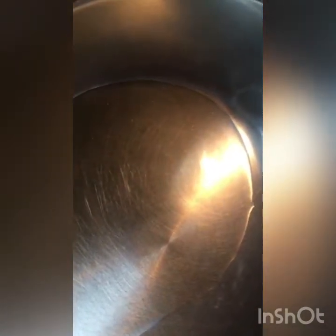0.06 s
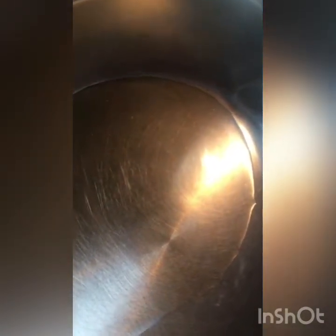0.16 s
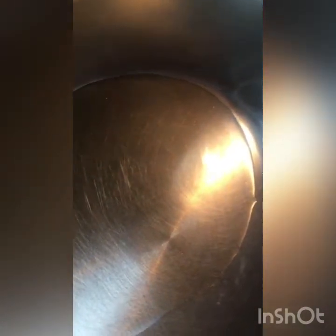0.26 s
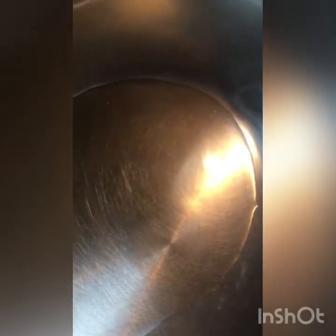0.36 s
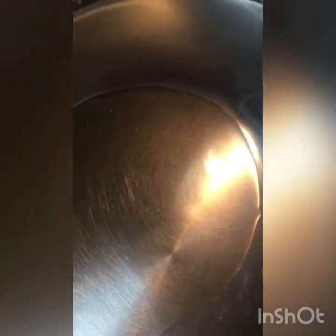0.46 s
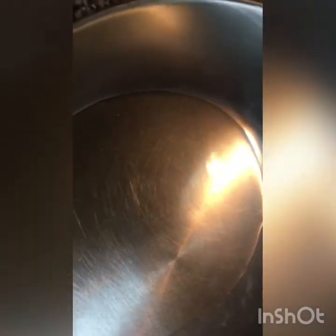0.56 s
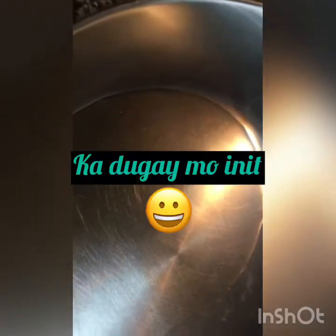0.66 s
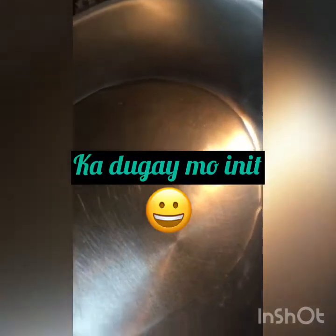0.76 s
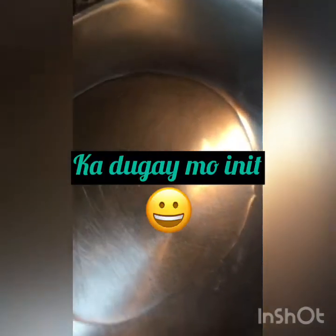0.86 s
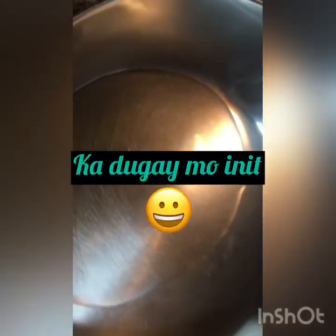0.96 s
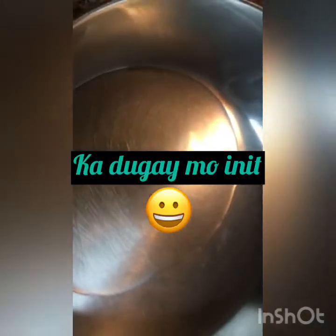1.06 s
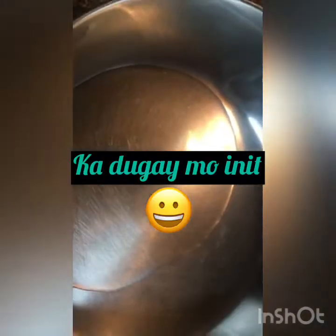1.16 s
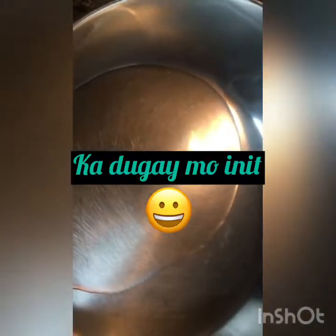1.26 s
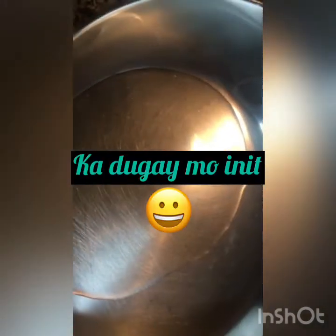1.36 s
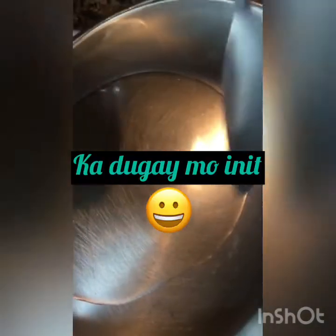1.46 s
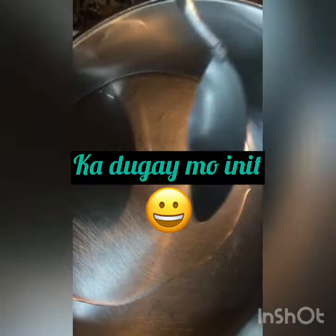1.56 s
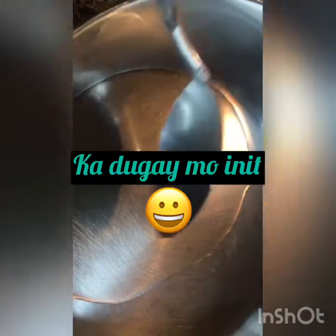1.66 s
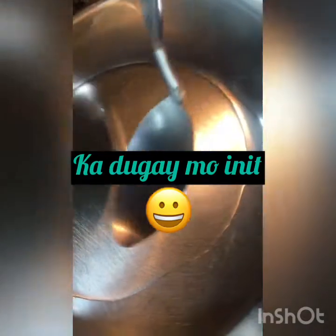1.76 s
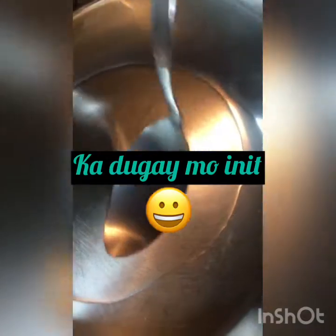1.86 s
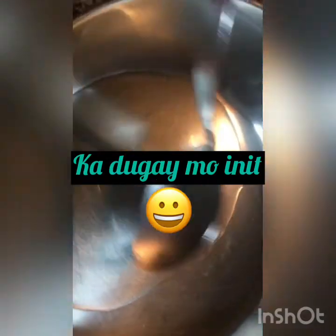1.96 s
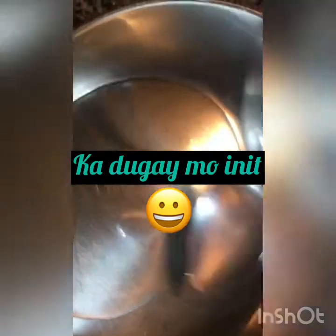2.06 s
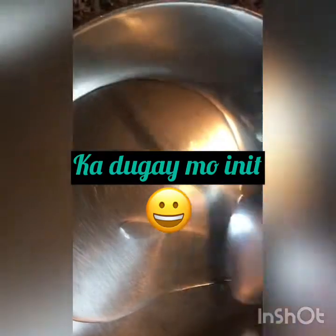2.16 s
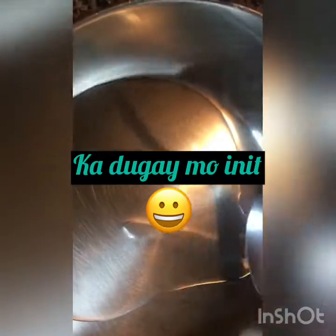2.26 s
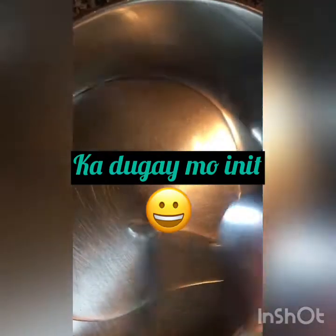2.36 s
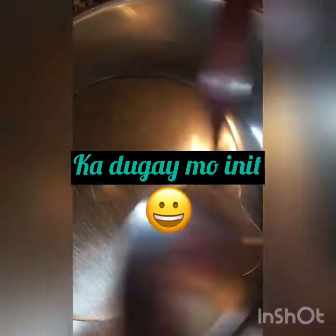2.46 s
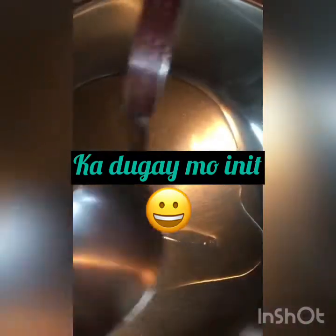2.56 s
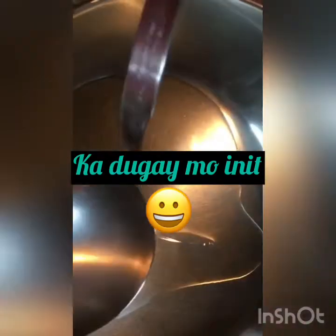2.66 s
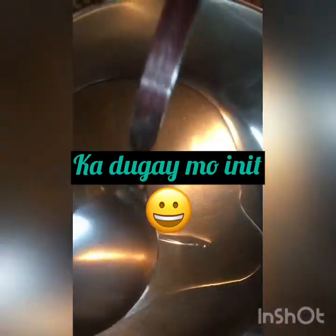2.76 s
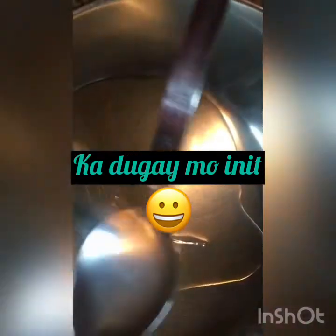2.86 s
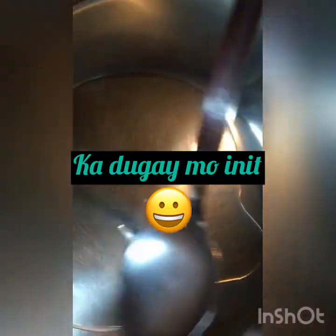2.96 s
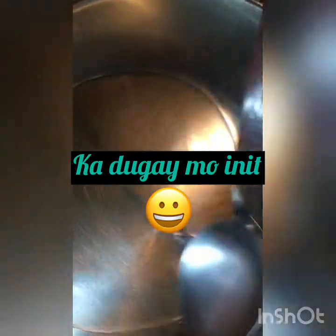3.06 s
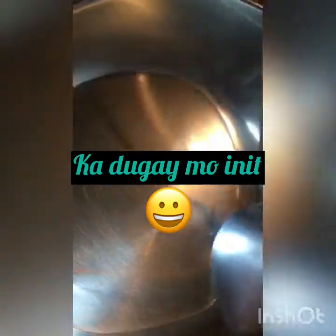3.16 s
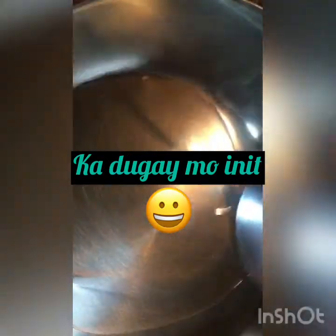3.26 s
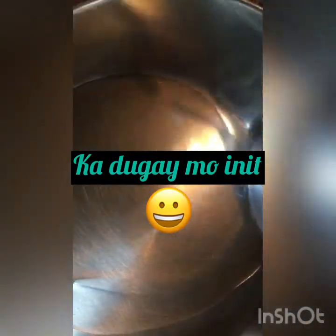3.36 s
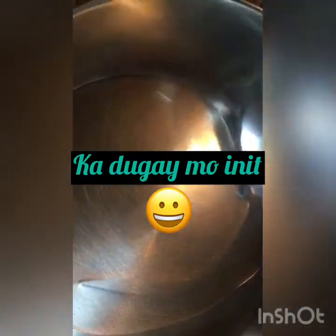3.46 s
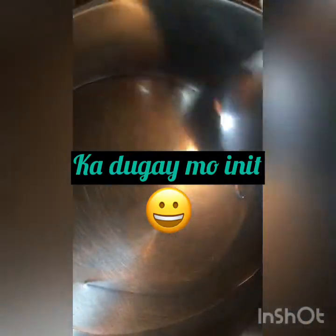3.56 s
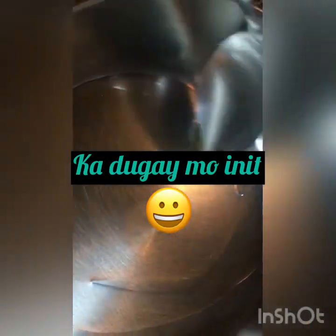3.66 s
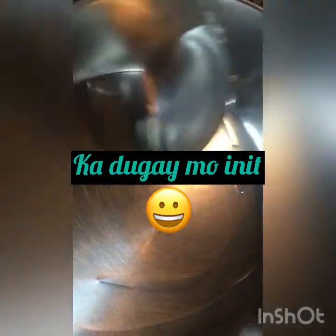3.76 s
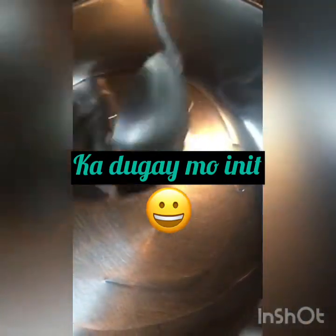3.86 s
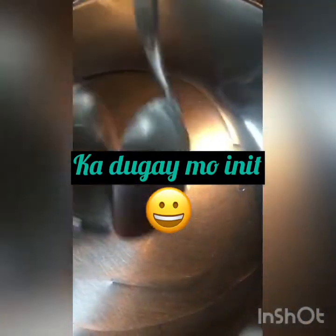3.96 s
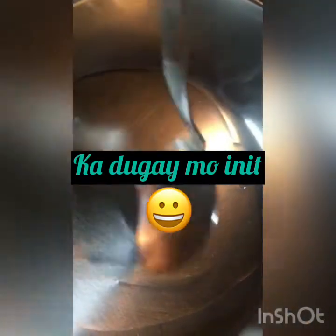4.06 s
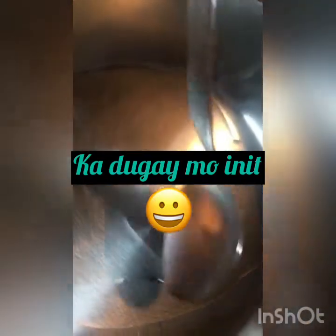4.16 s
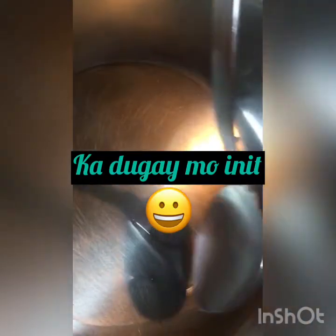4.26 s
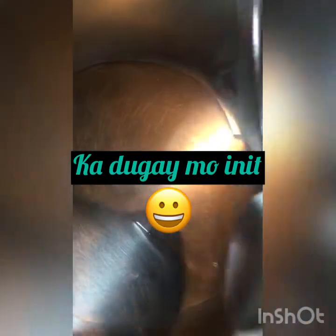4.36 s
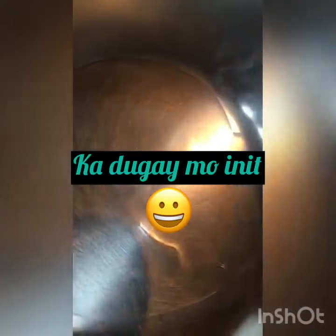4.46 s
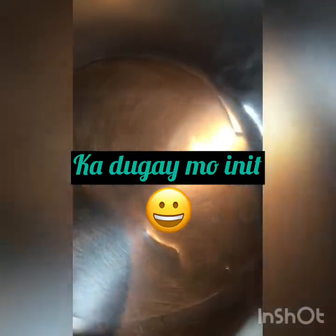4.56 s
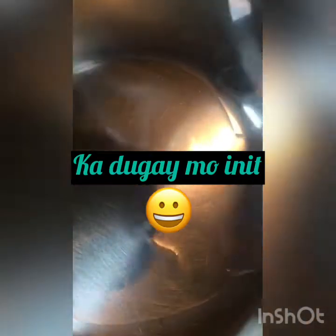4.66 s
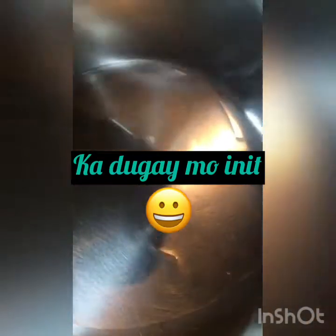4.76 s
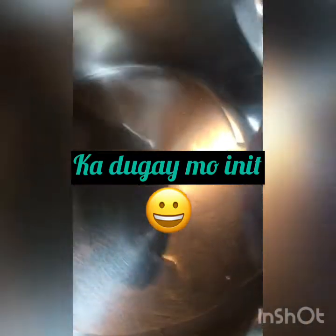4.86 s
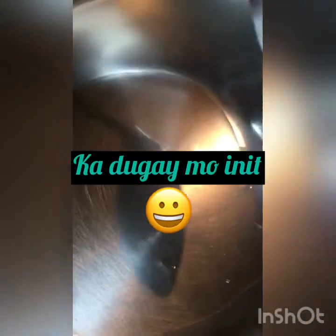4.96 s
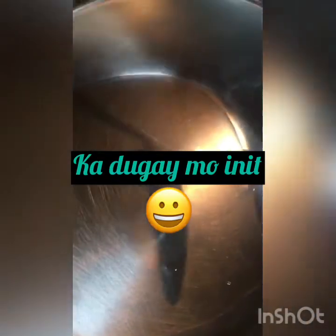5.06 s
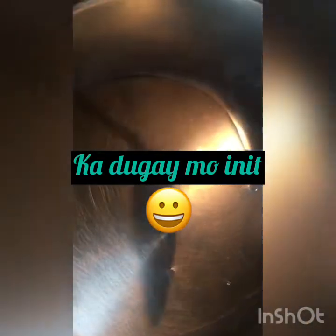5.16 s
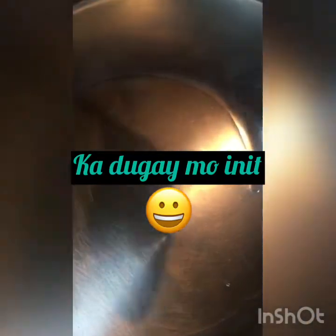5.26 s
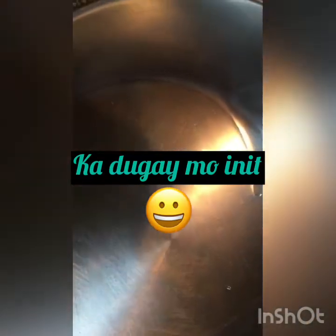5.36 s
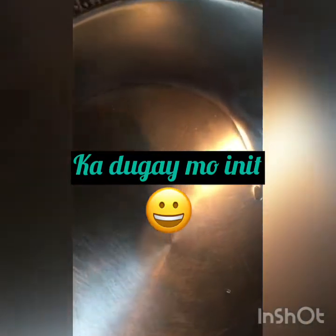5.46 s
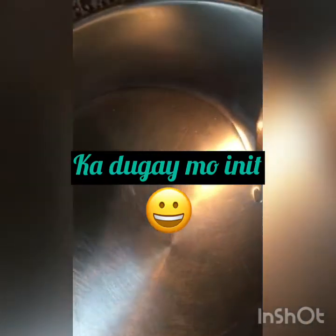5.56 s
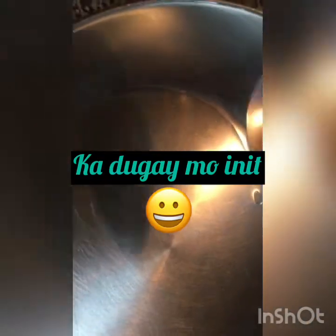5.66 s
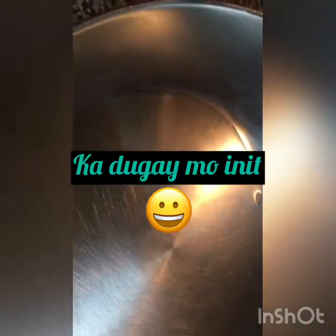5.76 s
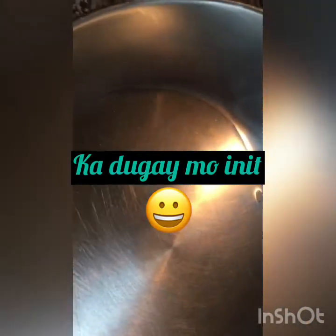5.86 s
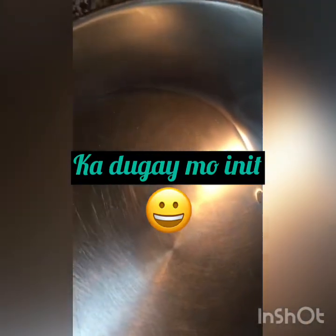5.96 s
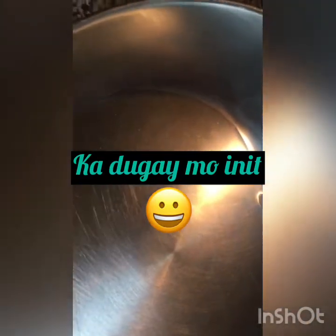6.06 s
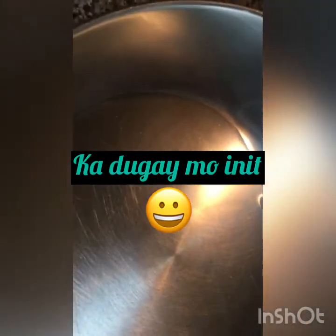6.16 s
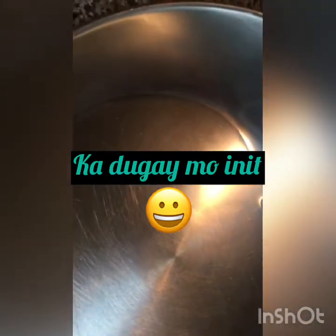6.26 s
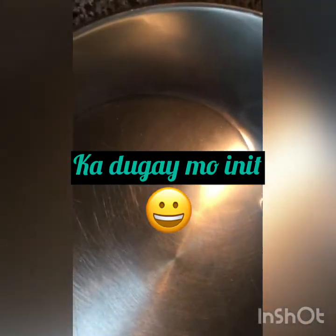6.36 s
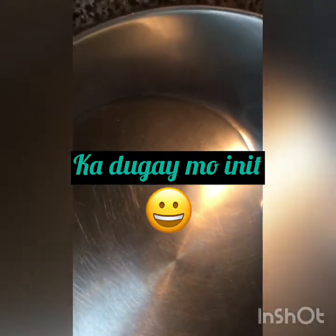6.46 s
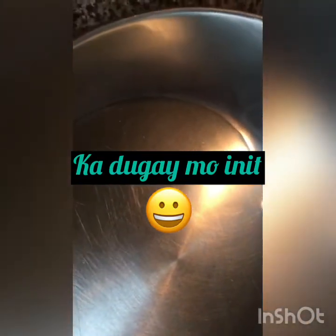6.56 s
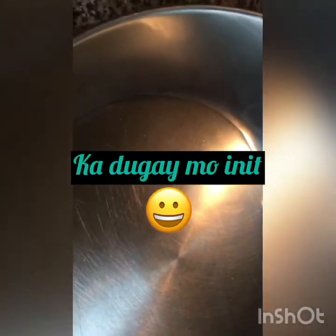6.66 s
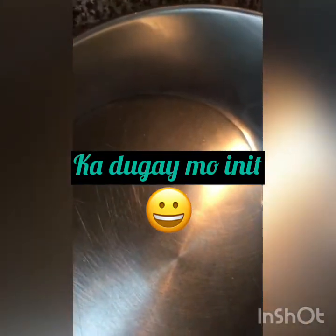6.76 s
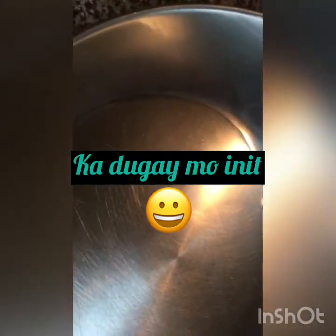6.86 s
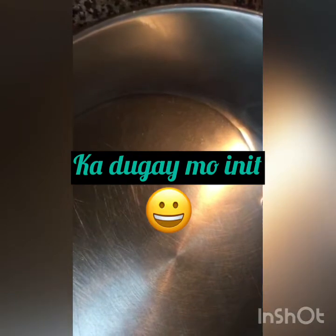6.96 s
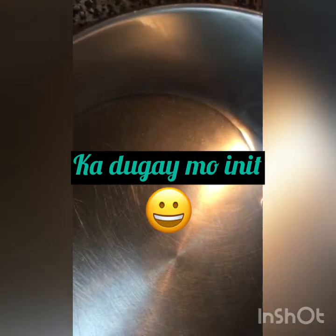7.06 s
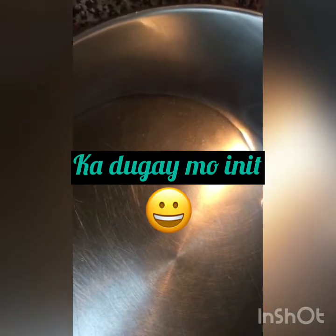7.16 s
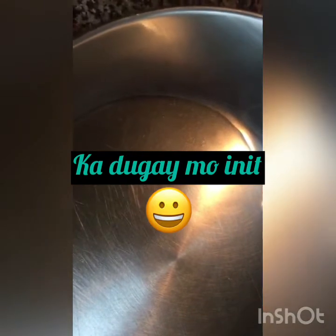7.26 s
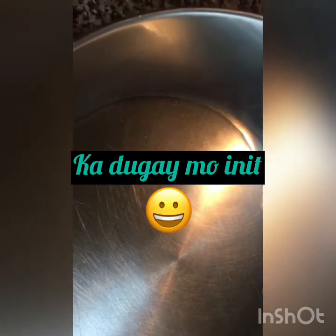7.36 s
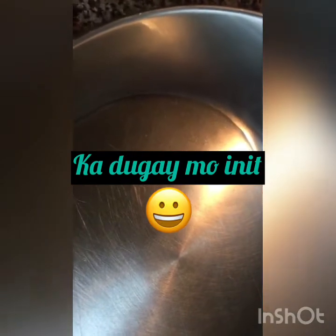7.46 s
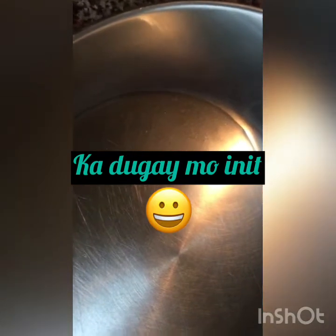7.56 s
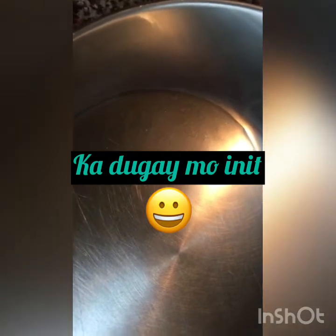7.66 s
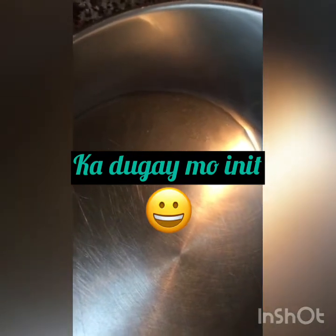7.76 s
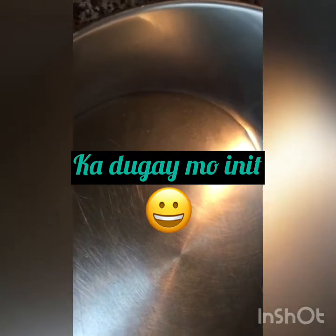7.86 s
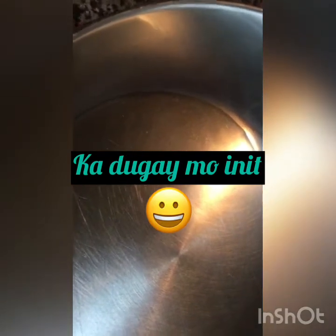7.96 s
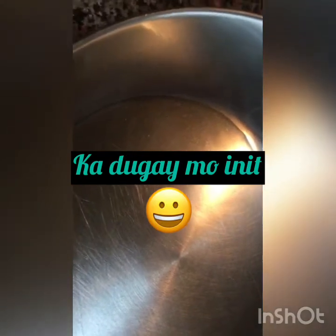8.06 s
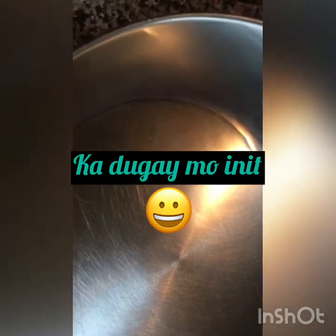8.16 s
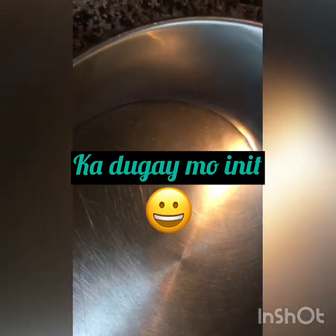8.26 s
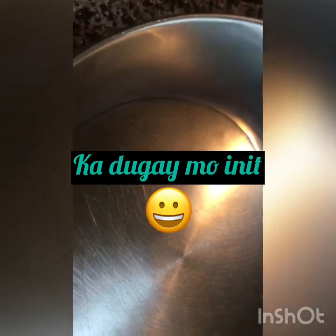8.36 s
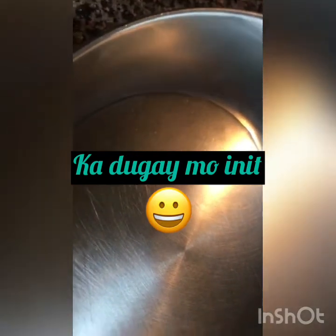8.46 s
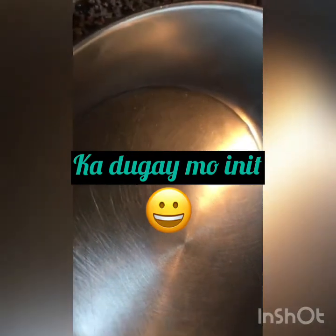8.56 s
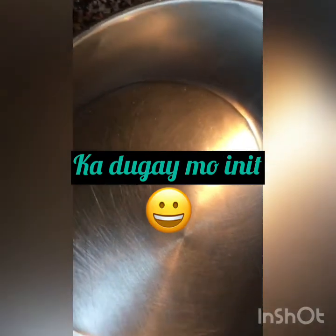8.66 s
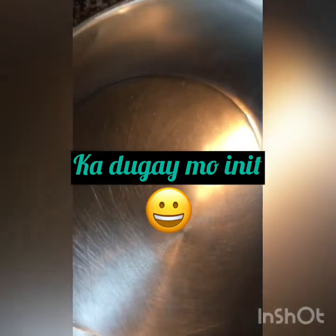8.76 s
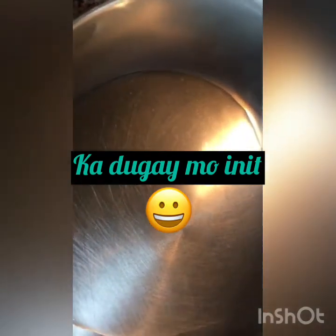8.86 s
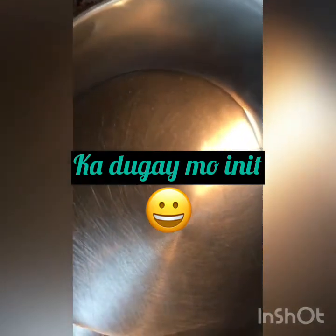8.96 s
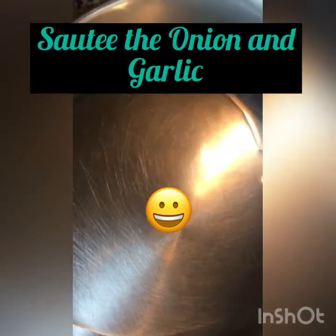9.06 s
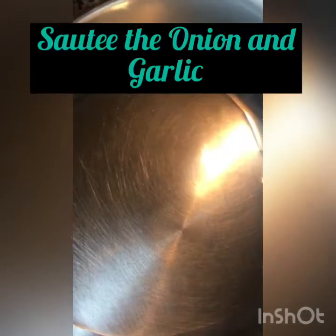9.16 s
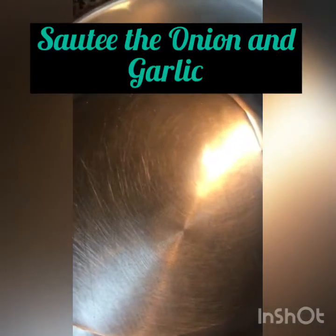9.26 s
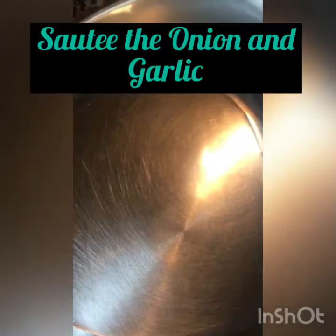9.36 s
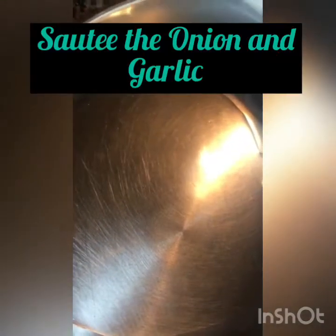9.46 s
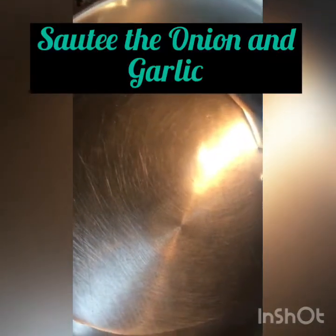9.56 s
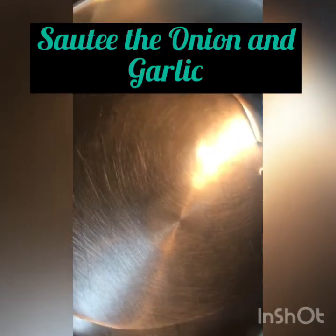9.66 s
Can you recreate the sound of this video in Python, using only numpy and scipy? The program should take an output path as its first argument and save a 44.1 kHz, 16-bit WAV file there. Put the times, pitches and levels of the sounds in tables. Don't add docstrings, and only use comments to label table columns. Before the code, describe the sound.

Close up in a small kitchen, a low fan and gas flame hum runs throughout. After a quiet start, a steel ladle strikes an empty steel pan with loud, bright knocks, then scrapes around it in four gritty strokes with catches and ringing. It lifts out; a duller tap sounds further off, then the ladle slides onto other metal with a bright chime, leaving the hum.

```python
import sys
import numpy as np
from scipy import signal
from scipy.fft import rfft, irfft, next_fast_len
from scipy.io import wavfile
from scipy.ndimage import uniform_filter1d, map_coordinates

SR = 44100
rng = np.random.default_rng(int(sys.argv[2]) if len(sys.argv) > 2 else 0)


def output_pcm(signal):
    pcm = np.clip(np.atleast_2d(signal).T, -1, 1) * 32767
    wavfile.write(sys.argv[1], SR, np.round(pcm).astype(np.int16))


def natural_amplitude(level_db):
    exponent = np.asarray(level_db, float) / 20
    return 10 ** exponent


N = 428493


def level(x, db):
    return x * natural_amplitude(db) / np.sqrt(np.mean(x ** 2) + 1e-30)


def add(out, s, x):
    i = int(s * SR)
    out[i:i + len(x)] += x[:len(out) - i]


def band(x, lo_hz, hi_hz, order):
    return signal.sosfilt(signal.butter(order, [lo_hz, hi_hz], "band", fs=SR, output="sos"), x)


def colour(x, points):
    hz, db = np.transpose(points)
    f = np.arange(len(x) // 2 + 1) * SR / len(x) + 1
    gain = natural_amplitude(np.interp(np.log(f), np.log(hz), db))
    return irfft(rfft(x) * gain, len(x))


def walk(size, rate):
    hold = int(SR / rate)
    steps = np.repeat(rng.standard_normal(size // hold + 1), hold)
    return 1.29 * uniform_filter1d(uniform_filter1d(steps, hold), hold)[:size]


def steady(x):
    return x / np.sqrt(uniform_filter1d(x ** 2, size=SR // 20) + 1e-30)


# f/Hz, level/dB per Hz
RUMBLE = [(14, -29.5), (57, 1), (153, -2), (195, -11), (800, -25), (1450, -22.5), (2420, -38),
          (8000, -44.5)]
# f/Hz, width/Hz, level/dB
WHINE = [(149.6, 47.6, -55.5), (293.4, 95, -60), (600.4, 55, -73), (1437, 170, -63), (9280, 350, -80),
         (11380, 550, -75)]
# t/s, level/dB
FLAME = [(0, 1.5), (.9, -2), (4.4, 2), (6.3, 1.5), (8.6, -1.5), (9.72, 0.5)]
# t/s, level/dB
FAN = [(0, 0.5), (2.9, 0), (3.6, -3), (4.6, -3), (5.1, 0), (9.72, 1)]


def hum():
    noise = rng.standard_normal(next_fast_len(N))
    bed = level(colour(noise, RUMBLE)[:N], -48.5) * natural_amplitude(0.61 * walk(N, rate=0.6))
    for hz, width, db in WHINE:
        whine = ring(ring(rng.standard_normal(N), hz, width), hz, width)
        bed = bed + level(whine, db) * natural_amplitude(1.3 * walk(N, rate=3.2))
    t = np.arange(N) / SR
    swell = natural_amplitude(np.interp(t, *np.transpose(FLAME))) - 1
    sag = natural_amplitude(np.interp(t, *np.transpose(FAN))) - 1
    return bed + swell * band(bed, 310, 1700, order=1) + sag * band(bed, 30, 220, order=1)


def kitchen(x):
    t60_s, top_hz = 0.12, 5000
    t = np.arange(SR // 2) / SR
    noise = rng.standard_normal(len(t))
    dull = signal.lfilter(*signal.butter(1, top_hz, fs=SR), noise)
    fade = natural_amplitude(-60 * t / t60_s)
    tail = (dull + (noise - dull) * fade) * fade * (t > .004)
    return signal.oaconvolve(x, tail / np.sqrt(np.sum(tail ** 2)))[:len(x)]


def ring(x, hz, width):
    r = np.exp(-np.pi * width / SR)
    poles = [1, -2 * r * np.cos(2 * np.pi * hz / SR), r * r]
    return signal.lfilter([(1 - r * r) / 2, 0, (r * r - 1) / 2], poles, x)


def long_ring(x, modes):
    out = 0
    for hz, db, t60 in modes:
        width = np.log(1000) / (np.pi * t60)
        out = out + natural_amplitude(db) * ring(x, hz, width) * SR / (2 * np.pi * width)
    return out


def chatter(ms, size, rise_ms=.2):
    t_ms = 1000 * np.arange(size) / SR
    spikes_db = 2.5 * np.minimum(rng.exponential(size=size), 3)
    grit = rng.standard_normal(size) * natural_amplitude(spikes_db)
    return grit * (1 - np.exp(-t_ms / rise_ms)) * np.exp(-t_ms / ms)


def far_tap(row, modes):
    s, peak_db, chatter_ms, lo_hz, hi_hz = row
    echo_db = -11 if s > 5 else -19.5
    blow = chatter(chatter_ms, size=SR // 2)
    thud = band(blow, lo_hz, hi_hz, order=4)
    rings = long_ring(blow / np.sqrt(np.sum(blow ** 2)), modes)
    rings = band(rings, .3 * lo_hz, min(1.4 * hi_hz, 15000), order=3)
    near = thud / np.abs(thud).max() + rings
    return natural_amplitude(peak_db) * (near + natural_amplitude(echo_db) * kitchen(near))


# t/s, peak/dB, chatter/ms, lowest f/Hz, highest f/Hz
TAPS = [(1.478, -55, 4.4, 3000, 6000), (2.65, -52, 7.2, 3000, 11000), (3.335, -36.5, 16, 2500, 11500),
        (6.549, -27, 13, 300, 2600), (6.724, -47.5, 9, 2300, 11500), (8.2755, -32, 2.0, 900, 1750),
        (8.28, -35, 5.0, 1000, 1800), (8.279, -52, 9.0, 1900, 3300), (6.549, -38, 8, 3000, 7000),
        (1.504, -26.5, 28, 1500, 6500), (6.56, -39.5, 32, 400, 3800)]
# f/Hz, level/dB, t60/s
TAP_RING = [
    [(3280, -5.5, .04), (5560, -5.5, .04)],
    [(7900, -13, 0.046)],
    [(7686, -12, .05)],
    [(282, -9, 0.052), (1226, -10, 0.041), (1750, -20, .04)],
    [(7700, -14, .04)],
    [(1500, -16, 0.029)],
    [(1213, -15, .04), (921, -5, .04)],
    [(3060, -12, .03)],
    [(4610, -9, .05)],
    [(2350, -20, .1)],
    [(953, -18, .05)],
]


def taps():
    out = np.zeros(N)
    for row, modes in zip(TAPS, TAP_RING):
        add(out, row[0], far_tap(row, modes))
    return out


def free_ring(s, hz, db, t60, swell_ms):
    t = np.arange(int(t60 * SR)) / SR
    flutter_db = 2.5 * np.interp(35 * t, np.arange(128), rng.standard_normal(128))
    envelope = natural_amplitude(db + flutter_db - 60 * t / t60) * (1 - np.exp(-1000 * t / swell_ms))
    return envelope * np.sin(2 * np.pi * hz * (t + int(s * SR) / SR))


# t/s, f/Hz, level/dB, t60/s
PAN_RINGS = [
    (1.52, 237, -41, 2.8),
    (1.73, 237, -44, 1.6),
    (2.72, 237, -44, 1.0),
    (3.42, 235, -44, 1.8),
    (1.52, 333, -48, 3.0),
    (3.385, 333, -38, 1.2),
    (2.68, 150, -42, 1.0),
    (1.5, 810, -38, .42),
    (1.71, 810, -26, .2),
    (1.71, 1040, -26, .08),
]


def pan_rings():
    out = np.zeros(N)
    for s, hz, db, t60 in PAN_RINGS:
        add(out, s, free_ring(s, hz, db, t60, swell_ms=1000 * 5 / hz))
    return out


# t/s, f/Hz, level/dB, t60/s
LADLE_RINGS = [(1.5, 3305, -39, 0.3), (1.5, 3390, -52, 0.4), (1.5, 2720, -38, .12), (1.5, 4064, -50, .22),
               (1.5, 4720, -38, 0.19), (1.5, 4425, -47, .17), (1.5, 5001, -44, .14), (1.5, 5766, -43, .16),
               (1.5, 5997, -44, .15), (1.5, 1012, -31, 0.094), (1.5, 5560, -41, 0.23),
               (1.5, 1803, -43, 0.25), (1.5, 2353, -39, .22), (3.385, 2735, -34, .3),
               (2.048, 2692, -27, 0.18), (2.062, 10400, -34, 0.13), (3.8, 2730, -39, 0.25),
               (3.39, 3243, -36, 0.41), (3.521, 2715, -22.5, 0.15), (4.09, 7850, -41, .12),
               (4.09, 9200, -40, .15), (6.55, 4640, -51, .22), (6.55, 4680, -54, .26),
               (3.612, 2730, -26, 0.24), (3.53, 9290, -38, 0.24), (7.92, 5141, -38, .21),
               (7.92, 2094, -36, .16), (7.92, 6729, -38, .16), (7.925, 2645, -27, .27),
               (7.925, 2654.02, -30, .3), (7.14, 6200, -61.5, .3)]


def ladle_rings():
    out = np.zeros(N)
    for row in LADLE_RINGS:
        add(out, row[0], free_ring(*row, swell_ms=4.5))
    return out


# f/Hz, level/dB, t60/s
CHIME = [(3009, -40.5, .7), (3176, -38, .35), (3596, -42, .33), (3811, -35, .25), (4323, -42, .45),
         (1776, -38, .3), (8145, -39, .18), (4527, -33, .25), (5400, -27, .09), (6261, -32, .22),
         (7036, -36, .13), (7200, -30, .14), (8690, -36, .2), (9281, -35, .2)]


def chime():
    out = np.zeros(N)
    for mode in CHIME:
        add(out, 7.915, free_ring(7.915, *mode, swell_ms=1.9))
    return out


# t/s, level/dB
REST = [
    (7.865, -59),
    (7.872, -29.5),
    (7.908, -32.5),
    (7.914, -23.5),
    (7.967, -26),
    (8.039, -47),
    (8.11, -71),
]
# f/Hz, width/Hz, level/dB
REST_RING = [(1266, 36, -1), (1783, 13, 4), (2630, 19, 1), (3080, 93, -7), (3780, 60, -7), (4570, 73, -8),
             (5120, 61, -4.5), (2100, 46, -6), (5970, 47, -7.5), (7210, 36, 0), (8000, 40, -6.5),
             (8860, 83, -4), (11050, 53.4, -15), (2400, 110, -11)]
# from f/Hz, to f/Hz
SLIDE_PARTS = [(2000, 13000), (400, 2000)]


def lay_down():
    out = np.zeros(N)
    low_share = (-12.5, -.15)
    add(out, REST[0][0], drag(REST, REST_RING, SLIDE_PARTS, [low_share], hiss_db=-7.0, wander_db=2.5))
    return out


# t/s, attack/s, length/s, level/dB
BRUSHES = [
    (0.408, .012, 0.042, -65),
    (1.119, 0.02, .15, -64.5),
    (3.332, 0.049, 0.054, -36.5),
    (6.721, .004, 0.037, -55),
    (7.098, 0.052, 0.093, -62),
    (9.32, .07, 0.18, -68),
]
# f/Hz, width/Hz, level/dB
BRUSH_RING = [
    [(2850, 29, -7), (9280, 23, -6), (11200, 43, -2)],
    [(3240, 34, -7), (7010, 31, -5), (7890, 34, -1), (9800, 43, -10), (11400, 44, -11)],
    [(4440, 65, -11), (7700, 73, -15), (10100, 100, -9)],
    [(2620, 57, -6), (7820, 58, -2), (10000, 42, 4), (11700, 140, -16)],
    [(6180, 25, 0), (7640, 35, 6), (9300, 43, -3), (11000, 32, -13)],
    [(9370, 57, -9.5), (11200, 45, -5), (11700, 41, -6)],
]


def brushes():
    out = np.zeros(N)
    for (s, attack, length, db), peaks in zip(BRUSHES, BRUSH_RING):
        curve = [(s, db - 8), (s + attack, db), (s + length, db - 4.5)]
        add(out, s, drag(curve, peaks, SLIDE_PARTS, [], hiss_db=1.0, wander_db=6.0, patchy_db=-1.5))
    return out


SHEET_HZ = np.sort(rng.uniform(500, 12300, size=90))


def sheet(x, patchy_db, width_hz):
    out = 0
    for k in range(0, len(SHEET_HZ), 3):
        patch = natural_amplitude(patchy_db * walk(len(x), rate=20)) if patchy_db else 1
        out = out + patch * sum(ring(x, hz, width_hz) for hz in SHEET_HZ[k:k + 3])
    return out


def knock(row, peaks, size=SR // 5):
    _, peak_db, chatter_ms, tilt_db, sheet_db = row
    damp_hz = 40
    blow = chatter(chatter_ms, size, rise_ms=.9)
    body = sum(natural_amplitude(db) * ring(blow, hz, width + damp_hz) for hz, width, db in peaks)
    crack = band(blow, 630, 2500, order=2) + natural_amplitude(1.099 * tilt_db) * band(blow, 2500, 13000, order=1)
    shimmer = level(sheet(crack, 0, width_hz=13), -16.5) * np.hanning(2 * size)[size:]
    wash = band(chatter(30, size), 1500, 6500, order=1)
    thump = band(blow, 120, 730, order=2)
    near = level(body, 0) + level(crack, -6) + level(sheet(crack, 0, width_hz=26), sheet_db)
    near = near + shimmer + level(wash, -22.5 + sheet_db / 4) + level(thump, -18)
    return natural_amplitude(peak_db) * near / np.abs(near).max()


# t/s, peak/dB, chatter/ms, tilt of the crack towards treble/dB, sheet level/dB
KNOCKS = [(1.4999, -1.5, 3.2, -4, -19.5), (1.68, -11, 5.8, -0.5, -5), (1.7095, -.5, 5.6, 2.5, -12.5),
          (2.6733, -5, 3.9, 11, -22), (2.751, -14, 4, 13, -20), (3.384, -7.5, 8.3, 6, -11),
          (3.521, -12, 8.8, 18, -17), (7.868, -25.5, 8.8, 0, -1), (7.912, -11, 9.5, 25, 2),
          (1.7155, -2.5, 6, 2, -12), (1.7236, -9.5, 5, 6, -16.5), (2.681, -8.5, 2.6, 11, -16)]
# f/Hz, width/Hz, level/dB
BOWL_EDGE = [(620, 48, -9), (1080, 50, -7), (1690, 60, -6), (2720, 50, -5), (3305, 36, 6),
             (4140, 56, -10.5), (4710, 44, -3), (5563, 44, 0.5), (6030, 52, -12), (6700, 49, -11.5),
             (8060, 91, -16), (9200, 170, -15.5), (10500, 88, -22), (11100, 25.5, -14)]
BOWL_HEEL = [(1641, 29, -6.5), (2720, 50, 0), (3305, 42, -8), (4430, 35, -11), (5300, 30, -9),
             (6080, 22, -9), (8760, 25, -13), (9670, 35, -17), (10000, 37, -18), (11400, 16, -18)]
BOWL_FLAT = [(644, 17, -8), (786, 14, -8.5), (1680, 80, 0), (2720, 100, 0), (3352, 90, -4), (4100, 26, -11),
             (4500, 70, -14), (5230, 70, -7), (7170, 31, -9), (7847, 52, -1.5), (10400, 130, 1.5),
             (9860, 42, 1), (11500, 47, -8)]
BOWL_TIP = [(1100, 37, -7.5), (1570, 43, -7.5), (2630, 53, -7.5), (3067, 49, -0.5), (3900, 52, -25),
            (4300, 36, -26), (6000, 60, -6), (7760, 34, 0), (9200, 60, -6), (10180, 110, 1.5),
            (11400, 37, -4)]
PAN_WALL = [(825, 360, 2.5), (2750, 37, 6), (5250, 620, 6.5), (5900, 110, 4), (8400, 180, -12),
            (9100, 520, -2), (11500, 120.6, -2)]
PAN_FOOT = [(786, 280, -7.5), (1490, 29, -13), (2660, 23.4, -12), (3020, 80, -7), (5300, 120, -6),
            (7700, 24.5, -1.5), (9290, 27, 3.5), (10200, 82, -7)]
REST_KNOCK = [(3050, 40, -4), (4500, 27, -24), (5400, 26, -4), (7200, 27, -3), (8890, 56, 18),
              (11200, 45, -8)]


def knocks():
    out = np.zeros(N)
    places = [BOWL_EDGE, BOWL_HEEL, BOWL_FLAT, BOWL_TIP, BOWL_TIP, PAN_WALL, PAN_FOOT, REST_KNOCK, REST_KNOCK,
              BOWL_FLAT, BOWL_FLAT, BOWL_TIP]
    for row, peaks in zip(KNOCKS, places):
        add(out, row[0], knock(row, peaks))
    return out


# t/s, peak/dB
JOLTS = [(1.821, -21), (1.912, -13), (1.973, -16), (1.941, -21), (1.985, -13.5), (1.9915, -15), (2.85, -23),
         (2.925, -27), (3.091, -34), (3.138, -23), (3.612, -29), (3.664, -28), (3.681, -21.5), (3.842, -22),
         (3.911, -15.5), (3.96, -27), (4.095, -27.5)]


def jolts():
    out = np.zeros(N)
    chatter_ms, tilt_db, sheet_db = 9.6, 13.5, 1.5
    for s, db in JOLTS:
        peaks = LAST_DRAG if s > 3 else FIRST_DRAG
        add(out, s, knock((s, db, chatter_ms, tilt_db, sheet_db), peaks, size=SR // 12))
    return out


def sing(length, hz, db):
    spread = .002
    grit = rng.standard_normal(2 * SR // 5)
    pair = sum(ring(ring(grit, hz * (1 + side * spread), 18 + hz * spread), hz, 300) for side in (-1, 1))
    share = np.clip(np.arange(SR // 3) / SR / length, 0, 1)
    return natural_amplitude(db) * steady(pair)[-len(share):] * np.sqrt(2) * np.sin(np.pi * share)


# t/s, length/s, f/Hz,
# level/dB
SINGS = [(1.893, .125, 11750, -36), (1.919, .14, 7790, -27.5), (1.941, .06, 9960, -33),
         (1.947, 0.074, 3370, -32.5), (1.946, .075, 9400, -31), (1.956, .065, 9230, -33),
         (1.986, .065, 2956, -34), (2.026, .05, 9180, -29.5), (2.778, .13, 2713, -39),
         (2.915, .15, 2720, -46), (2.844, 0.11, 10100, -32.5), (2.859, .14, 7480, -41),
         (2.84, 0.13, 8950, -38), (2.857, 0.045, 2020, -40), (2.936, 0.14, 11530, -40.5),
         (3.026, .26, 7720, -42), (3.061, .065, 9120, -34), (3.115, .105, 11800, -41),
         (2.8, .1, 10300, -42), (3.16, 0.13, 3200, -45.5), (3.545, 0.11, 9190, -41),
         (3.57, 0.23, 10000, -41.5), (3.55, 0.11, 634, -47.5), (3.649, 0.11, 2857, -36.5),
         (3.672, .105, 9170, -36), (3.675, .11, 1713, -42.5), (3.676, 0.067, 675, -48.5),
         (3.763, .3, 7640, -37), (3.781, .28, 2906, -49), (3.817, .314, 11900, -52),
         (3.828, .235, 1758, -45.5), (3.85, .115, 6270, -45), (3.874, .09, 1722, -35),
         (3.771, 0.14, 886, -50.5), (3.891, 0.064, 827, -41), (3.896, .085, 5230, -37),
         (3.995, .13, 3360, -41.5), (4, .085, 860, -44), (4.084, .055, 7770, -41.5),
         (4.07, .06, 10000, -37.5), (1.958, 0.071, 5250, -36), (3.695, 0.12, 4390, -51),
         (3.9, 0.086, 4130, -44), (4.08, 0.056, 3970, -50), (2.83, 0.063, 6000, -43),
         (1.124, 0.036, 3240, -67), (7.869, 0.042, 3070, -33.5), (7.917, .035, 3050, -35),
         (7.91, .045, 7130, -31), (7.915, 0.064, 8660, -33),
         (3.335, 0.07, 800, -48.5), (3.13, .13, 700, -53.5), (2.99, 0.046, 1220, -46.5),
             (3.4, .07, 1130, -46.5), (3.13, .07, 1480, -48), (2.75, .1, 2150, -48),
             (2.89, .11, 2900, -42.5), (3.11, .2, 2800, -47), (3.09, 0.16, 5300, -50),
             (3.66, 0.08, 3880, -47), (3.84, .1, 3250, -40.5), (3.96, .17, 5650, -46),
             (1.99, .06, 5200, -39), (2.0, .07, 2400, -44)]


def sings():
    out = np.zeros(N)
    for s, *row in SINGS:
        add(out, s, sing(*row))
    return out


def bend(x, share):
    return map_coordinates(x, [np.cumsum(1 + share * walk(len(x), rate=7))], order=3, mode="wrap")


# f/Hz, level/dB per Hz
DRAG_HISS = [(240, -56), (400, -41.5), (841, -9), (1740, -12.5), (2470, -14.5), (2780, -7), (3660, -12.5),
             (10300, -7.5)]


def drag(curve, peaks, parts, shares, hiss_db, wander_db=4.5, patchy_db=4, deaf=()):
    s, contact_db = np.transpose(curve)
    usual_db, light_db = -35, -50
    pressure_db = np.maximum(contact_db, light_db) - usual_db
    part_db = [0 * s] + [db + slope * pressure_db for db, slope in shares]
    size = next_fast_len(int((s[-1] - s[0] + 0.054) * SR))
    t = s[0] + np.arange(size) / SR
    spikes_db = 2.5 * np.minimum(rng.exponential(size=size), 4)
    judder_db = 2.1 * walk(size, rate=70)
    grit = rng.standard_normal(size) * natural_amplitude(spikes_db + judder_db)
    body = 0
    for hz, width, db in peaks:
        for split in (-0.0026, 0.0026):
            body = body + natural_amplitude(db + wander_db * walk(size, rate=18.5)) * ring(grit, hz * (1 + split), width)
    hiss = colour(grit, DRAG_HISS)
    body = body + natural_amplitude(hiss_db) * (sheet(hiss, patchy_db, width_hz=50) + 0.4 * hiss)
    for hz, width in deaf:
        body = body - .85 * ring(body, hz, width)
    lift = np.clip((s[-1] - t) / 0.01, 0, 1)
    land = np.clip((t - s[0]) / 0.0036, 0, 1)
    touch = natural_amplitude(np.interp(t, s, contact_db)) * lift * land
    out = 0
    for edges, db in zip(parts, part_db):
        part = steady(bend(band(body, *edges, order=3), share=.002))
        out = out + part * natural_amplitude(np.interp(t, s, db))
    return touch * out


# t/s, contact level/dB
DRAGS = [
    [(1.74, -61), (1.772, -51), (1.86, -26.5), (1.92, -36), (1.96, -30.5), (2.01, -24.5), (2.068, -30.5),
     (2.085, -58.5), (2.13, -80)],
    [(2.76, -39), (2.81, -42), (2.886, -32), (2.974, -35), (2.996, -38), (3.07, -37.5), (3.204, -36),
     (3.296, -50), (3.315, -51)],
    [(3.395, -28.5), (3.457, -32.5), (3.511, -48.5), (3.518, -14)],
    [(3.535, -46), (3.573, -44.5), (3.701, -36.5), (3.81, -43.5), (3.925, -26.5), (3.99, -33.5),
     (4.12, -40.5), (4.137, -68), (4.18, -79)],
]
# from f/Hz, to f/Hz
DRAG_PARTS = [(4500, 8500), (400, 2200), (2200, 4500), (8500, 13000)]
# low pan level/dB, ladle bowl level/dB, thin rim level/dB
DRAG_SHARES = [(-7.5, -4.5, 1.5), (-11, -6, 2.5), (-10, -9, -7), (-10, -4.5, 0)]
SQUEEZE = (-0.51, -0.33, -0.27)
# f/Hz, width/Hz
DEAF = [
    [(3720, 250), (8600, 400), (2850, 200)],
    [(4930, 310), (2400, 190)],
    [(3700, 300), (2350, 300)],
    [(3620, 140), (2450, 170)],
]
# f/Hz, width/Hz, level/dB
FIRST_DRAG = [(910, 65, -16.5), (1700, 150, -19.5), (2698, 43, -19), (3305, 50, -3), (3980, 160, -16),
              (5270, 43, -9), (5602, 35, -10.5), (6050, 32, -11), (7047, 35, -10), (7654, 50, -2.5),
              (9060, 39, -1.5), (9980, 97, 5.5), (10400, 127, -3.5), (11360, 120, -11.5)]
SECOND_DRAG = [(752, 10, -15), (1150, 140, -10), (1390, 150, -12), (1756, 51, -10), (2020, 61, -14),
               (2740, 110, -9.5), (4400, 85, -13.5), (6000, 73, -11), (3040, 90, -16), (7770, 39, -1.5),
               (7660, 74, -2), (9350, 74, -4), (10120, 130, 0), (11440, 90, -3.5)]
WALL_DRAG = [(586, 110, -10.5), (1093, 60, -12), (2720, 25.7, -26), (2735, 22, -7.5), (4360, 29.96, -9.5),
             (4200, 32, 5), (5330, 520, -3), (6200, 83, -7), (8000, 140, -20), (9040, 44, 9),
             (9500, 42, 13), (10400, 30, 11.5), (10900, 56, 9)]
LAST_DRAG = [(851, 78, 4.5), (1780, 210, 2), (2670, 26, -13), (2905, 66, 3), (3280, 81, -8),
             (4020, 18, -14), (4200, 40, -5), (4620, 44, -7), (5150, 46, -7), (5600, 180, -9.5),
             (7720, 240, -4), (9230, 37, 4), (9940, 66, 1), (10600, 200, -5)]


def drags():
    out = np.zeros(N)
    strokes = [FIRST_DRAG, SECOND_DRAG, WALL_DRAG, LAST_DRAG]
    for curve, peaks, shares, deaf in zip(DRAGS, strokes, DRAG_SHARES, DEAF):
        add(out, curve[0][0], drag(curve, peaks, DRAG_PARTS, zip(shares, SQUEEZE), hiss_db=-1.0, deaf=deaf))
    return out


def scene():
    metal = taps() + ladle_rings() + chime() + lay_down() + brushes()
    metal = metal + knocks() + jolts() + sings() + drags()
    return (hum() + natural_amplitude(-10) * kitchen(metal) + pan_rings() + metal)[None]


def low_pass(x):
    return signal.sosfilt(signal.butter(12, 13190, fs=SR, output="sos"), x)


def record(dry):
    mix = signal.sosfilt(signal.ellip(8, .3, 60, 11800, fs=SR, output="sos"), dry)
    return low_pass(mix)


dry = scene()
out = record(dry)
output_pcm(out)
```